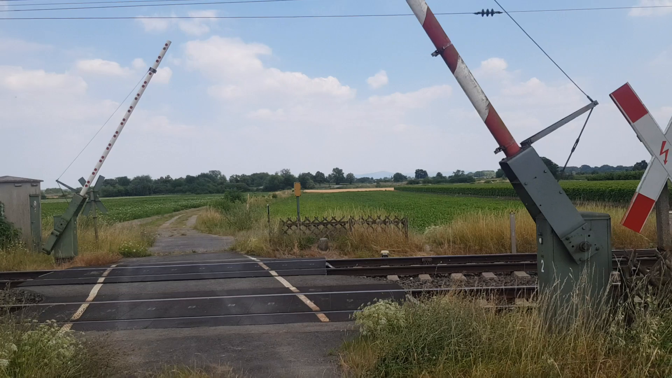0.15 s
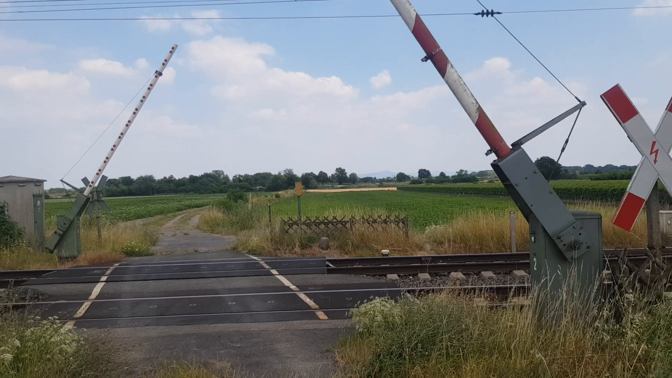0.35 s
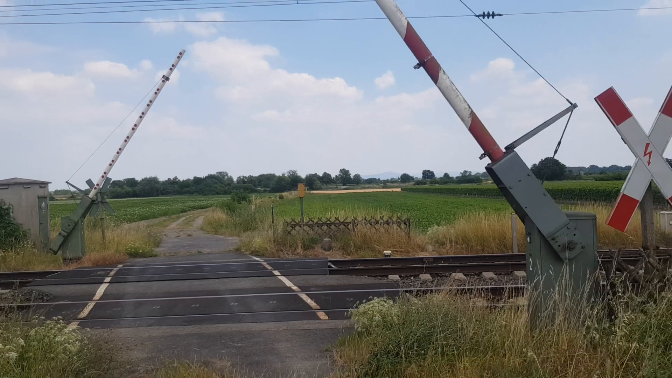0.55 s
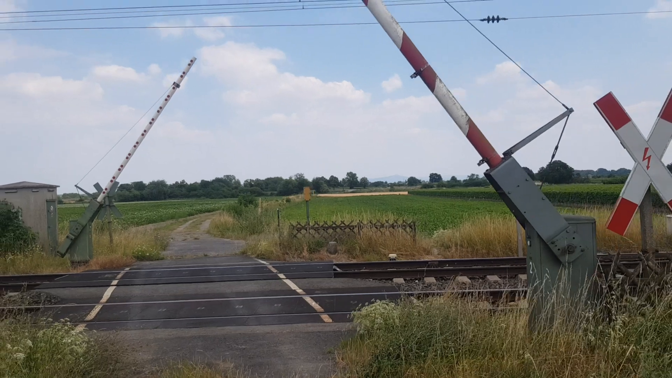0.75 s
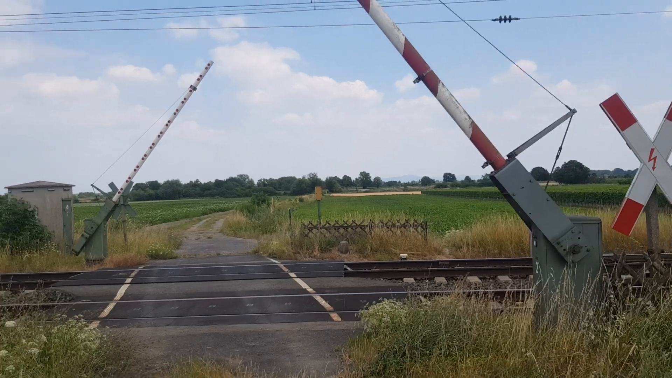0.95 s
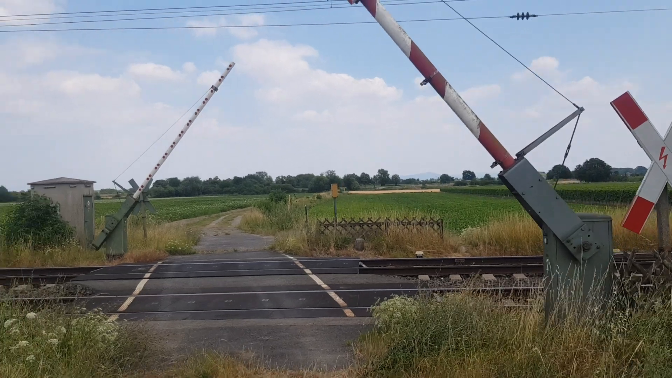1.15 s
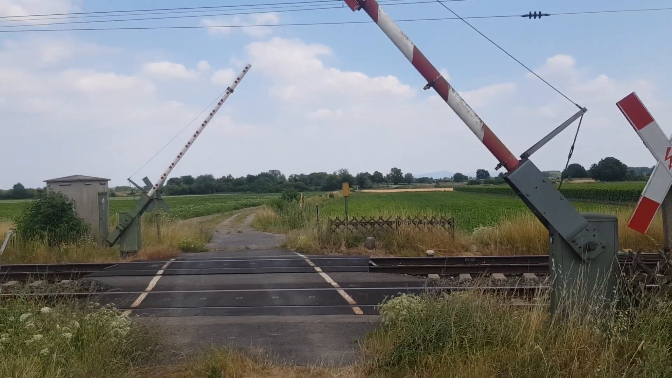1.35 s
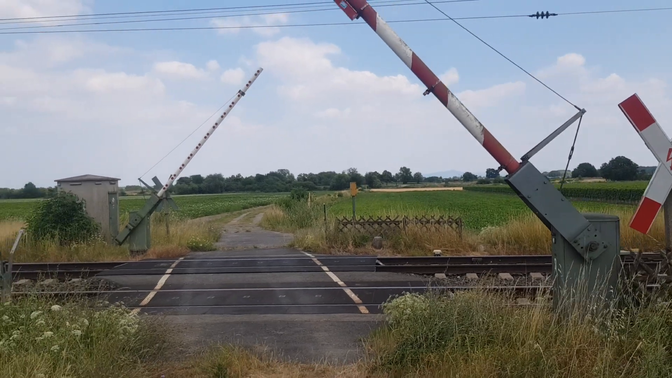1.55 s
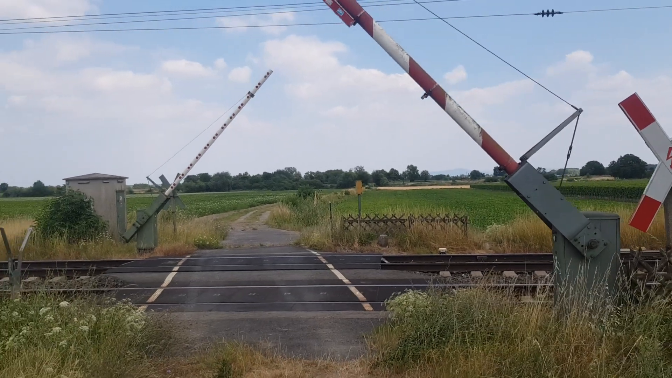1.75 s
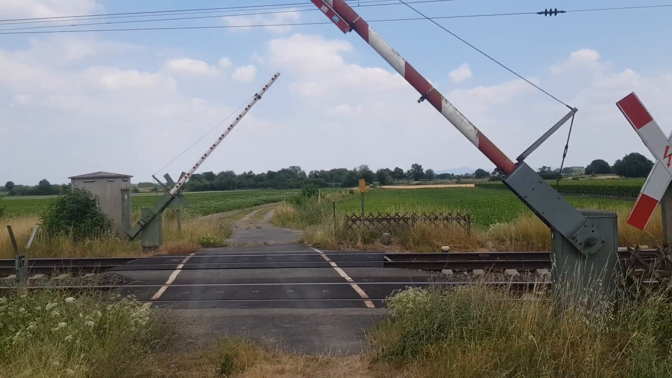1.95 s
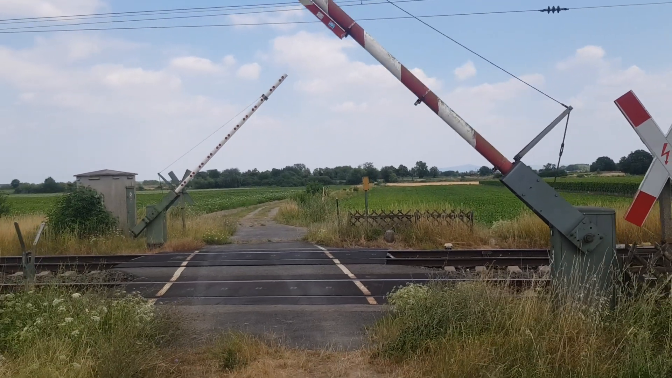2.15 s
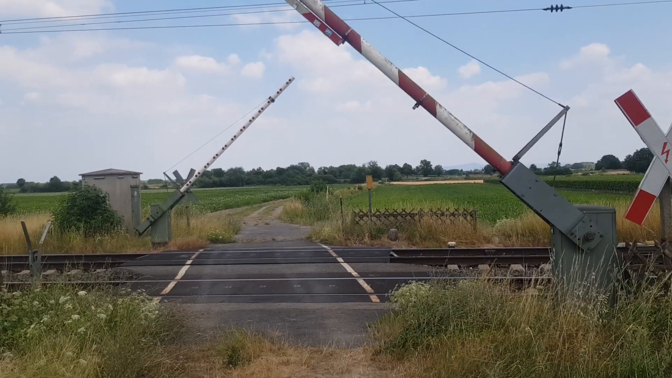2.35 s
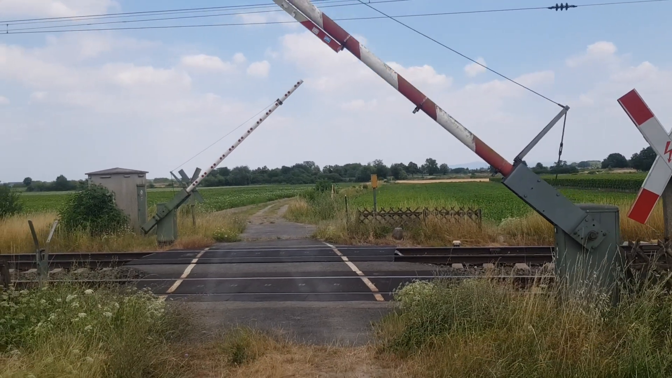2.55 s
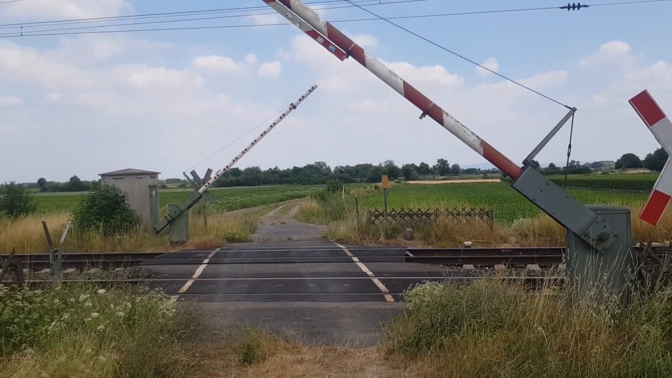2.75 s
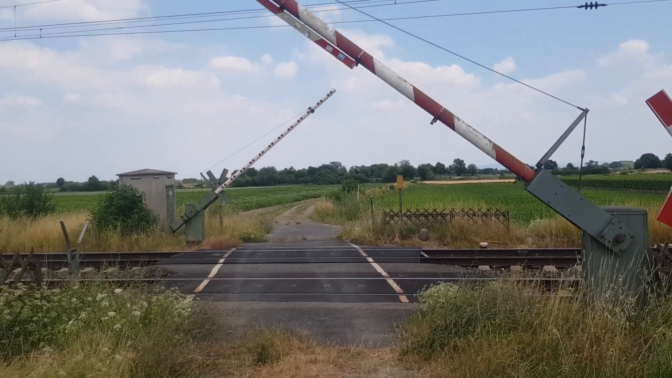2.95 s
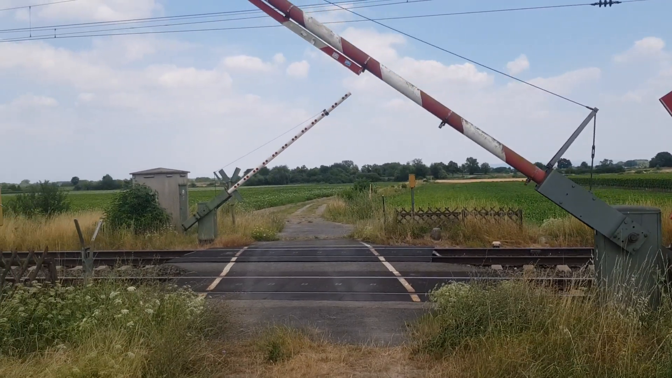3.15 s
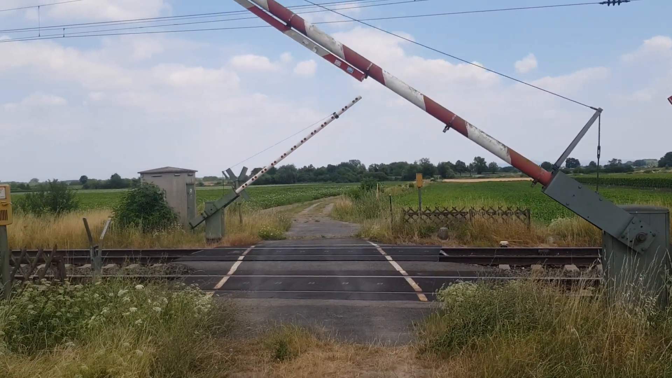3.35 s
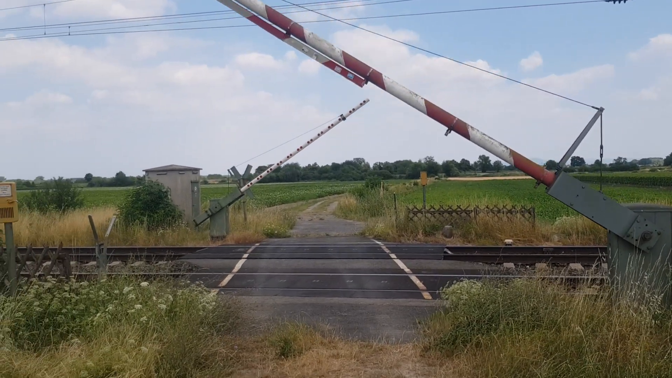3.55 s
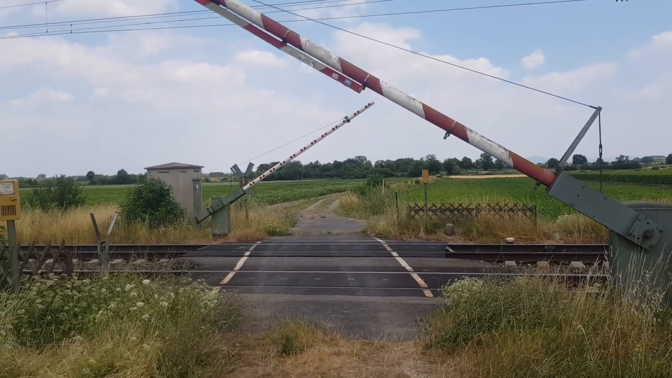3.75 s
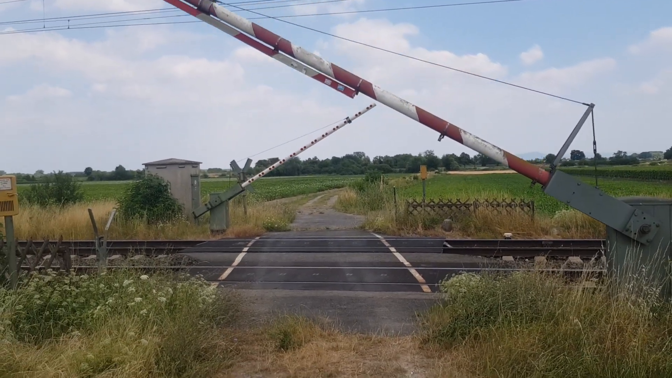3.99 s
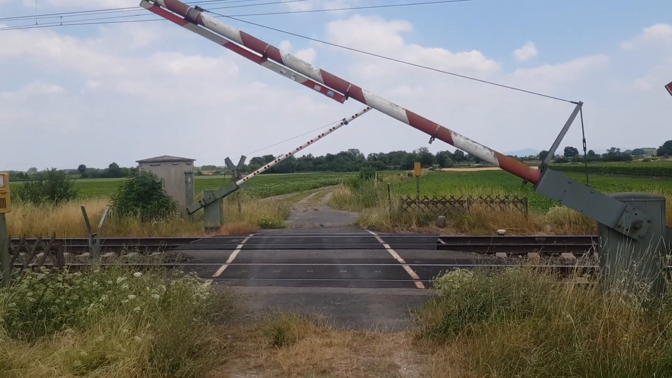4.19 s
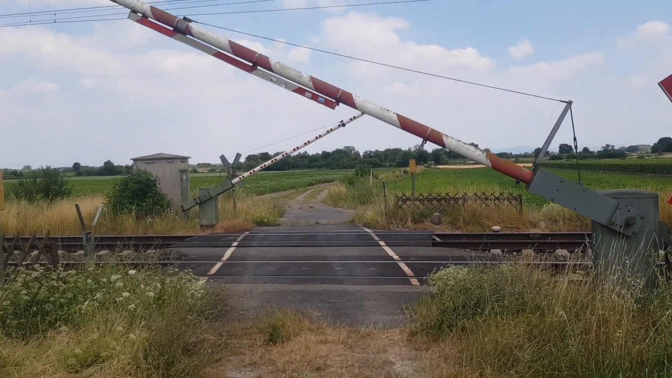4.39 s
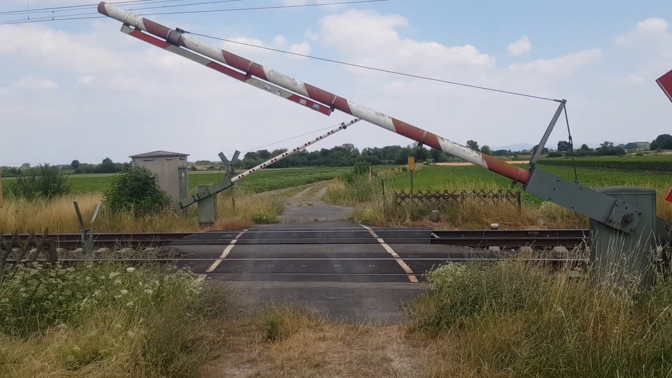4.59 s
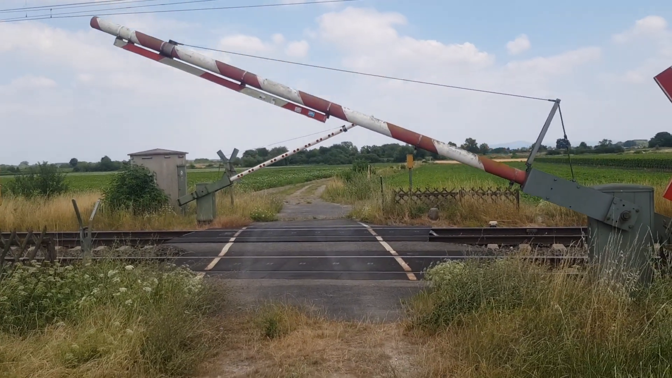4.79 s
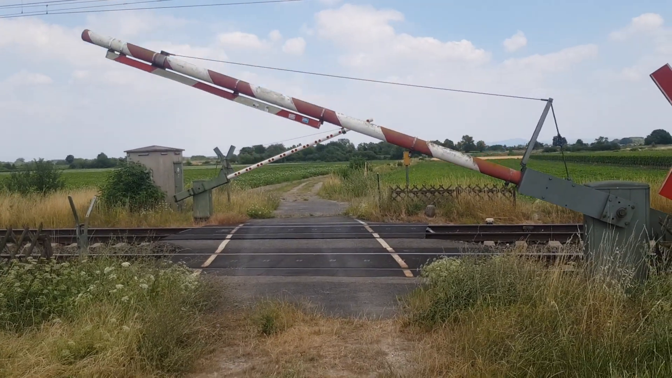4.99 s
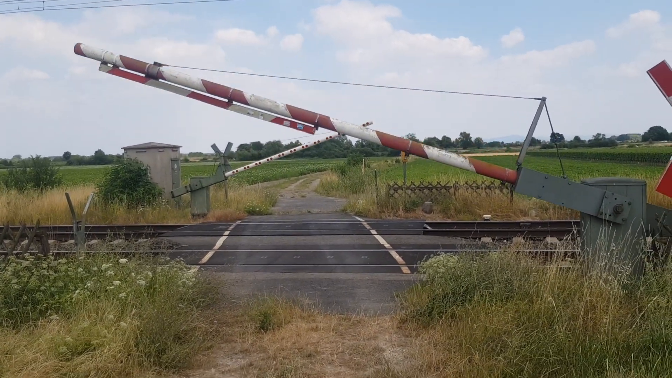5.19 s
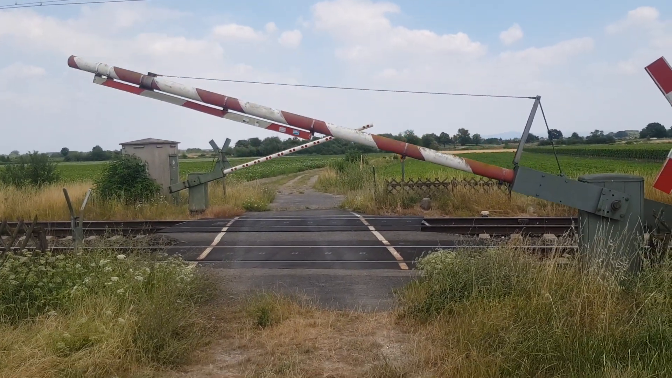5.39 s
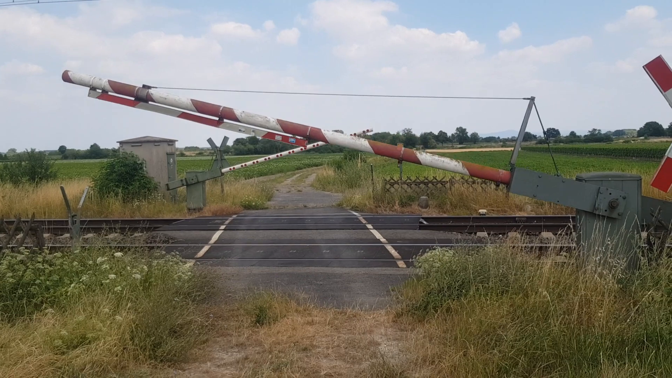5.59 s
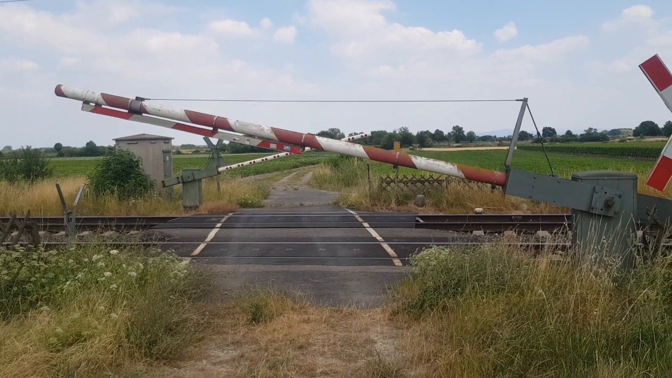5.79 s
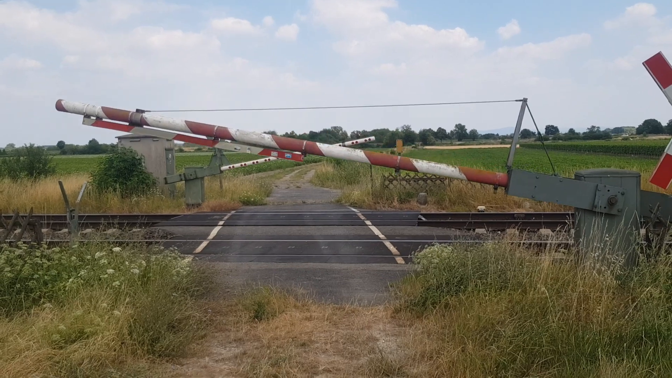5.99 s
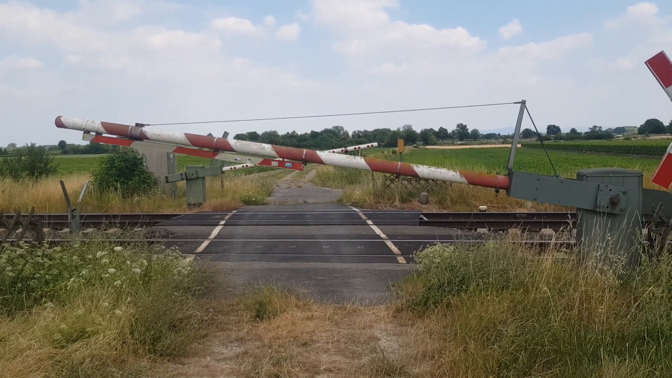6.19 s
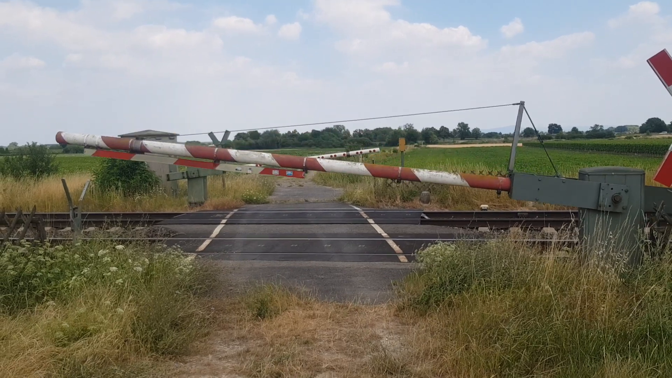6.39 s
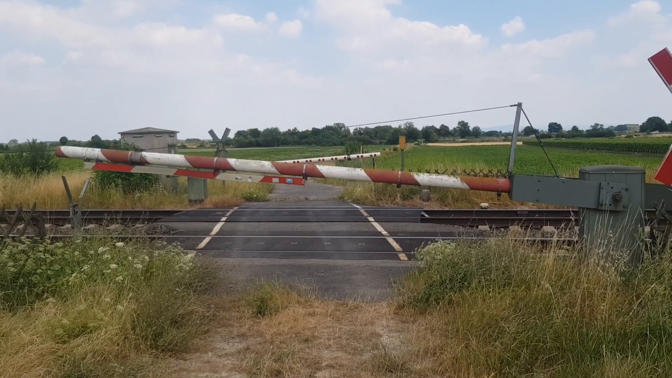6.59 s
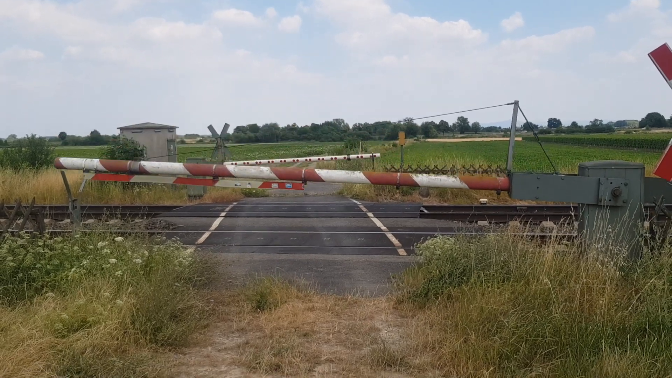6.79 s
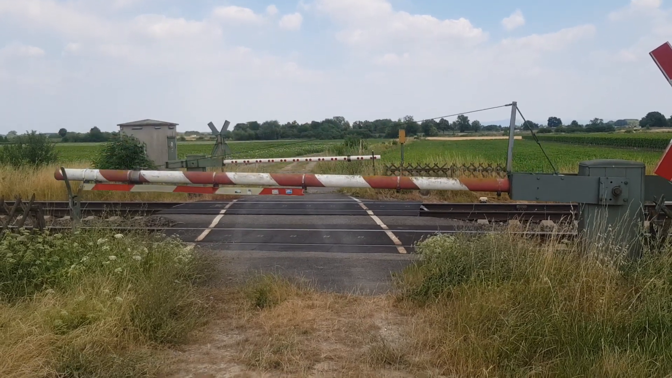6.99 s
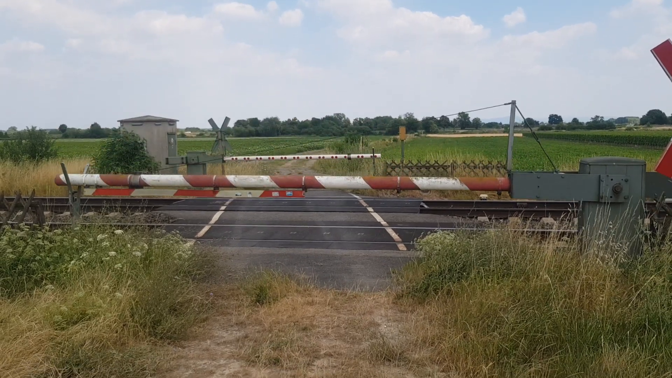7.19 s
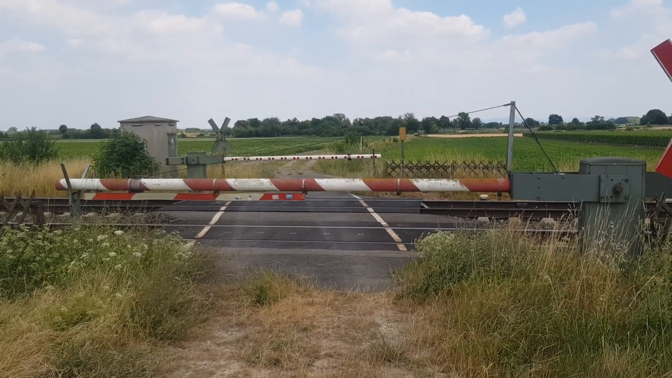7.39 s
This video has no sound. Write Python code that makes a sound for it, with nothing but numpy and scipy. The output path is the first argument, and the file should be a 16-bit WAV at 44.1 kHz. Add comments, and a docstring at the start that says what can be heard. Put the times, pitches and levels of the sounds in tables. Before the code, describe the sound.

From the start, the geared motor of a railway crossing barrier runs close by with a steady mid-pitched hum, higher whining tones that swell and fade, and a buzzing rattle from its steel case. A faint, high bearing squeal comes and goes on the right, while a thin hiss sits on the left. Small clicks occur at about 1.5 seconds. Light wind rumbles on the microphone, with a stronger puff around 4.2 seconds. At 5.5 seconds a dull knock sounds close on the left, followed by fainter ones around 6.4 as the hum and rattle grow slightly. The loudest knock comes at about 6.9 seconds as the boom lands. The motor runs free, slightly higher in pitch, then cuts off at 7.2 seconds and quickly spins down with a click. The setting is open fields with no echo.

```python
"""The geared motor of a level-crossing barrier hums and whines in its sheet-steel case as the boom comes down.
One shaft drives the gear tones, the rattle of the case and the squeal of a dry bearing.
The boom lands; the motor runs free for a moment, is switched off with a click and spins down.
A few dull knocks sound close by on the left, where there is also a thin high hiss.
Around it are open fields, and light wind brushes the microphone."""
import sys
import numpy as np
from scipy import signal
from scipy.fft import rfft, irfft, next_fast_len
from scipy.io import wavfile
from scipy.ndimage import map_coordinates

SR = 44100
rng = np.random.default_rng(int(sys.argv[2]) if len(sys.argv) > 2 else 0)


def materialize(psi):
    """Save the field psi as 16-bit PCM at rate SR to the path in sys.argv[1].

    A 1-D psi becomes a single channel; in a 2-D psi each row is a channel.
    """
    bounded = np.clip(np.atleast_2d(psi).T, -1, 1)
    quanta = np.round(bounded * 32767).astype(np.int16)
    wavfile.write(sys.argv[1], SR, quanta)


N = 328083
T = np.arange(N) / SR
SETTLE_S, LAND_S, OFF_S = 5.9, 6.87, 7.2  # boom settles, boom lands, current is cut
SETTLE_RISE_S, FREE_RISE_S, BRAKE_S = 0.29, 0.09, 0.34


def amp(db):
    """Decibels to gain."""
    return 10 ** (np.asarray(db) / 20)


def unit(x):
    """x scaled to rms 1."""
    return x / np.sqrt(np.mean(x ** 2) + 1e-20)


def along(points, hz, column=1):
    """One column of a frequency table, read on a log axis."""
    cols = np.transpose(points)
    return np.interp(np.log(hz + 1), np.log(cols[0] + 1), cols[column])


def curve(rows):
    """(seconds, value) rows interpolated to every sample."""
    return np.interp(T, *np.transpose(rows))


def ramp(start_s, length_s):
    """Rises from 0 to 1 and holds."""
    return np.clip((T - start_s) / length_s, 0, 1)


def swells(rows):
    """Summed bell curves in dB. Each row: centre in seconds, half-length in seconds, peak in dB."""
    return sum(db * np.exp(-((T - s) / half_s) ** 2) for s, half_s, db in rows)


def wobble(knots_per_s):
    """A smooth random curve."""
    coarse_s = T[::64]
    knots = rng.standard_normal(int(T[-1] * knots_per_s) + 4)
    return np.interp(T, coarse_s, map_coordinates(knots, [coarse_s * knots_per_s]))


def pan(db):
    """Constant-power stereo gains; db is left minus right."""
    pair = amp(np.array([[.5], [-.5]]) * db)
    return pair / np.sqrt(np.mean(pair ** 2, axis=0))


def filtered(x, response):
    """x shaped by a frequency response."""
    size = next_fast_len(N + 8192)
    return irfft(rfft(x, size) * response(np.fft.rfftfreq(size, 1 / SR)), size)[..., :N]


def noise(spectrum):
    """Coloured stereo noise, rms 1."""
    return unit(filtered(rng.standard_normal((2, N)), lambda hz: amp(along(spectrum, hz))))


def alike(pair, correlation):
    """Mixes two unrelated signals into correlated channels."""
    angle = np.arccos(np.clip(correlation, -1, 1)) / 2
    return np.cos(angle) * pair[0] + np.array([[1], [-1]]) * np.sin(angle) * pair[1]


def pace():
    """Shaft speed over loaded speed: up as the boom lands, then braked ever harder after the cut."""
    braking = np.maximum(1 - ramp(OFF_S, BRAKE_S) ** 1.3, .05)
    return (1 + .035 * ramp(LAND_S, FREE_RISE_S)) * braking


# Wind on the microphone. Each row: frequency in Hz, relative density in dB.
WIND_SPECTRUM = [(20, -18), (35, -2.5), (55, 4), (90, 2.5), (130, -7.5), (190, -16), (300, -35), (600, -62)]
# Puffs and lulls. Each row: centre in seconds, half-length in seconds, gain in dB.
WIND_PUFFS = [(.1, 0.16, 3), (.44, 0.032, 9), (.88, .06, 3.5), (1.55, .45, -3.5), (2.48, .035, 11),
              (3.36, 0.045, 5), (4.23, 0.073, 15), (4.34, 0.037, 11), (5.95, 0.022, 11), (6.6, 0.42, 4),
              (7.42, 0.2, 11)]


def wind(breeze_db=-56):
    """A low rumble; stronger puffs buffet each side of the microphone separately, mainly the left."""
    puff_db = swells(WIND_PUFFS)
    correlation = np.clip(.6 - .05 * puff_db, .1, .75)
    level_db = breeze_db + puff_db + 1.8 * wobble(14)
    return amp(level_db) * alike(noise(WIND_SPECTRUM), correlation) * pan(0.69 + 0.95 * puff_db)


# Hiss and sizzle colours. Each row: frequency in Hz, relative density in dB.
HISS_SPECTRUM = [(5000, -42), (7800, -14.5), (9000, -2.5), (9750, 2.5), (10300, -1.5), (11500, -2.5),
                 (13200, -10), (16000, -15)]
SIZZLE_SPECTRUM = [(12000, -40), (13400, -12), (14400, 2), (15600, 0)]
# Hiss before braking. Each row: time in seconds, level in dB.
HISS_ENVELOPE = [(0, -61.5), (.9, -62), (1.7, -64.2), (3.7, -63.9), (5.2, -66), (6.6, -64), (7.1, -66)]
# Sizzle swells and dips. Each row: centre in seconds, half-length in seconds, gain in dB.
SIZZLE_BUMPS = [(2.7, .35, -4), (3.27, .18, 6), (6.35, .08, 4), (7.27, .16, 5.5)]


def hiss(sizzle_base_db=-62.5, flutter_hz=88.7):
    """A thin hiss that dies with the motor and a higher, fluttering sizzle, both mostly on the left."""
    hiss_db = curve(HISS_ENVELOPE) + 0.51 * wobble(7)
    sizzle_db = sizzle_base_db + swells(SIZZLE_BUMPS) + 1.3 * wobble(7)
    phase = 2 * np.pi * np.cumsum(flutter_hz + 1.5 * wobble(4)) / SR
    flutter = unit(1 + 0.65 * np.cos(phase) + 0.48 * np.cos(2 * phase))
    thin_hiss = amp(hiss_db) * np.minimum(pace(), 1) ** 4 * noise(HISS_SPECTRUM)
    sizzle = amp(sizzle_db) * flutter * noise(SIZZLE_SPECTRUM)
    return thin_hiss * pan(13) + sizzle * pan(14)


# Click colour. Each row: frequency in Hz, relative density in dB.
CLICK_SPECTRUM = [(300, -9), (1000, -4), (1750, 2), (3000, -6), (4000, 0), (5000, -7), (6300, -4),
                  (8000, -14), (15000, -24)]
# Contacts. Each row: start in seconds, level in dB, t60 in seconds, low-pass corner in Hz, pan in dB.
CLICK_HITS = [(1.5003, -37.5, .009, 6000, 0), (1.565, -39, .028, 4500, 2), (1.574, -43, .04, 2200, 2),
              (7.02, -43.5, .35, 2200, 3), (7.3005, -34.5, .022, 7000, 2), (7.303, -41, .13, 1200, 4)]


def clicks():
    """Noise bursts from the linkage and end switch; harder contacts are brighter."""
    burst = noise(CLICK_SPECTRUM)
    out = np.zeros((2, N))
    for start_s, db, t60_s, corner_hz, pan_db in CLICK_HITS:
        envelope = amp(db - 60 * abs(T - start_s) / t60_s) * (T >= start_s)
        lowpass = signal.butter(2, corner_hz, fs=SR, output="sos")
        out += envelope * pan(pan_db) * unit(signal.sosfilt(lowpass, burst))
    return out


# Knocks. Each row: start in seconds, relative level in dB, ring in Hz, t60 in seconds, pan in dB.
KNOCK_HITS = [(5.5386, -23, 342, 0.051, 22), (5.551, -28, 126, 0.076, 14), (6.242, -42, 420, .05, 10),
              (6.428, -38, 235, 0.058, 13), (6.4615, -31, 430, 0.029, 18), (6.863, -13, 399, 0.041, 21),
              (6.872, -28, 425, 0.053, 10), (7.138, -36.5, 106, 0.048, 12)]
# Modes of a knock. Each row: multiple of the ring frequency, gain in dB, multiple of the t60.
DAMPED_MODES = [(.42, -15.5, 1.9), (1, 1, 0.85), (1.25, -6, 0.57), (1.9, -9.5, 0.54), (2.85, -13, .3),
                (5.1, -15.5, 0.19)]


def knocks(gain_db=6, attack_s=0.0012):
    """Soft contacts ring a few heavily damped modes."""
    out = np.zeros((2, N + SR))
    t = np.arange(SR // 4) / SR
    attack = 1 - np.exp(-t / attack_s)
    for start_s, db, ring_hz, t60_s, pan_db in KNOCK_HITS:
        ring = sum(amp(mode_db - 60 * t / (t60_s * t60_ratio)) * np.sin(2 * np.pi * ring_hz * ratio * t)
                   for ratio, mode_db, t60_ratio in DAMPED_MODES)
        start = round(start_s * SR)
        out[:, start:start + len(t)] += amp(db + gain_db) * pan(pan_db) * ring * attack
    return out[:, :N]


# Frame rumble. Each row: frequency in Hz, relative density in dB.
FRAME_SPECTRUM = [(90, -32), (170, 0), (250, 1), (320, 1), (400, -5.5), (700, -41.5)]


def shudder(base_db=-75):
    """The frame rumbles unevenly, more as the boom settles, as it lands and as the motor brakes."""
    rise_db = 13 * ramp(SETTLE_S, SETTLE_RISE_S) + 5 * ramp(LAND_S, FREE_RISE_S) + 6 * ramp(OFF_S, .1)
    return amp(base_db + rise_db + 2.2 * wobble(14)) * alike(noise(FRAME_SPECTRUM), 0.96) * pan(4)


def shaking(turns, repeat_db, pulse_depth):
    """Force of teeth and bearings: part repeats every turn, the rest is rubbing pulsed by the shaft."""
    one_turn = signal.resample(rng.standard_normal((2, 512)), 4096, axis=1)
    position = (turns % 1 * one_turn.shape[1]).astype(int)
    repeating = unit(one_turn[:, position])
    pulsing = 1 + pulse_depth * sum(np.cos(2 * np.pi * (k * turns + rng.random())) for k in range(1, 6))
    return amp(repeat_db) * repeating + pulsing * rng.standard_normal((2, N))


# Spells of squeal. Each row: centre in seconds, half-length in seconds, gain in dB.
SQUEAL_SPELLS = [(.24, 0.25, 13), (2.4, 1.8, 6.5), (3.96, .08, 8), (5.82, 0.075, 6), (7, 0.14, 6)]


def squeal(turns, base_db=-69, centre_hz=4525, width_hz=170):
    """Rubbing in a dry bearing feeds one high resonance, pulsing once a turn."""
    rubbing = shaking(turns, repeat_db=-7, pulse_depth=.08)
    ring = filtered(rubbing, lambda hz: 1 / (1 + (2 * (hz - centre_hz) / width_hz) ** 2))
    pulsing = 1 + 0.33 * np.sin(2 * np.pi * turns)
    level_db = base_db + swells(SQUEAL_SPELLS) + 1.5 * wobble(16)
    return amp(level_db) * unit(pulsing * ring) * pan(-8.5)


# Radiation of the case. Each row: frequency in Hz, relative gain in dB, pan in dB.
CASE_RESPONSE = [(233, -16.5, -6), (316, -8.5, 0), (412, -1.5, 2.5), (670, -1.5, 1.5), (975, -8.5, 4),
                 (1600, -7.5, -1.5), (1860, -10.5, 6), (2250, -9, 3.5), (2330, -11.5, 10), (2920, -11, 11),
                 (3670, -15.5, 3), (4360, -14.5, -8), (6070, -20.5, 6.5), (7240, -32, 9)]


def steel_case(hz):
    """Stereo response of the sheet-steel case, rolled off at both ends."""
    lowpass = 1 / np.sqrt(1 + (hz / 7600) ** 16)
    highpass = hz / np.hypot(hz, 120)
    return amp(along(CASE_RESPONSE, hz)) * pan(along(CASE_RESPONSE, hz, column=2)) * lowpass * highpass


def rattle(turns, churn_base_db=-55.5, buzz_base_db=-52.5, crossover_hz=1250, left_lead_s=0.00013):
    """The shaken case radiates a low churn and a bright, more regular buzz."""
    low_share = lambda hz: 1 / (1 + (hz / crossover_hz) ** 6)
    lead = lambda hz: np.exp(2j * np.pi * hz * left_lead_s * np.array([[.5], [-.5]]))
    rubbing = alike(shaking(turns, repeat_db=-10.5, pulse_depth=0.094), 0.5)
    buzzing = shaking(turns, repeat_db=-7, pulse_depth=.12)
    churn = unit(filtered(rubbing, lambda hz: steel_case(hz) * lead(hz) * np.sqrt(low_share(hz))))
    buzz = unit(filtered(buzzing, lambda hz: steel_case(hz) * np.sqrt(1 - low_share(hz))))
    settled, freed = ramp(SETTLE_S, SETTLE_RISE_S), ramp(LAND_S, FREE_RISE_S)
    churn_db = churn_base_db + 3.5 * settled + swells([(7.31, 0.04, 4.7)]) + 1.26 * wobble(12)
    buzz_db = buzz_base_db + settled + 0.7 * freed + swells([(.1, .5, 2)]) + 0.84 * wobble(9)
    return amp(churn_db) * churn + amp(buzz_db) * np.sqrt(np.minimum(pace(), 1)) * buzz


def tone(turns, order, waver_db, lag_rad_per_order=.03):
    """One wavering shaft order; the drive stands to the right, so the left channel lags."""
    lag_rad = min(order * lag_rad_per_order, np.pi / 2)
    phase = rng.uniform(0, 2 * np.pi) + np.array([[-.5], [.5]]) * lag_rad
    angle = 2 * np.pi * (order * turns % 1) + phase
    return np.sqrt(2) * np.sin(angle) * amp(waver_db * wobble(5))


# Tones that swell once, each at its own boom angle. Each row, keyed by shaft order: base level in dB,
# pan in dB, swell centre in seconds, half-length in seconds, swell in dB.
SWELLING_ORDERS = {21: (-75, -2, 6, 1, 12.5), 35: (-79.5, 5, 0.3, 2.3, 17.5), 40: (-70, -1, .7, 1.5, 15),
                   45: (-61.5, 1, 6.5, 1.1, 9.8), 52: (-69.5, 5, 6, 0.5, 10.5), 64: (-64, 6, 2, 0.8, 6.5),
                   83: (-61, 12, 1.6, 1.25, 6), 88: (-68.5, 9, 5, 0.3, 6), 100: (-64.5, 2, .2, .28, 7),
                   117: (-79, -6, 5.8, 3.5, 12.5)}
# Steady gear and slot tones. Each row: shaft order, level in dB, pan in dB.
STEADY_ORDERS = [(13, -76, 2), (18, -66, 2), (24, -68.5, 5), (33, -76, 2), (44, -73, -1), (54, -73, 8),
                 (58, -74, 3), (61, -70, 0), (62, -74, 2), (63, -75, 5), (69, -70, 17), (76, -71, 14),
                 (78, -70, 13), (79, -69, 10), (81, -71, 9), (82, -69, 15), (85, -71, 12), (86, -68, 11),
                 (90, -71, 7), (91, -69, 7), (102, -76, 0), (124, -71, -6), (126, -71, -7), (127, -70, -6),
                 (128, -67, -9)]


def whine(turns, unloaded_db=-4.5):
    """Higher gear and slot orders; the swelling ones chatter, flutter once a turn and drop off load."""
    swelling = np.zeros((2, N))
    for order, (db, pan_db, *swell) in SWELLING_ORDERS.items():
        chatter = unit(1 + .22 * wobble(60))
        swelling += amp(db + swells([swell])) * pan(pan_db) * chatter * tone(turns, order, waver_db=1.1)
    steady = sum(amp(db) * pan(pan_db) * tone(turns, order, waver_db=2.8)
                 for order, db, pan_db in STEADY_ORDERS)
    flutter = 1 + .18 * np.sin(2 * np.pi * turns)
    load = amp(unloaded_db * ramp(LAND_S, FREE_RISE_S))
    return load * flutter * swelling + steady


# Main gear hum. Each row: time in seconds, base level in dB.
MESH_ENVELOPE = [(0, -54.5), (1.05, -51.2), (2.4, -49), (4.1, -50), (5.05, -52.5), (6.2, -47.5),
                 (6.8, -49.5)]
# Teeth go slack after landing, then bite. Each row: centre in seconds, half-length in seconds, gain in dB.
MESH_BACKLASH = [(6.97, 0.064, -8), (7.16, 0.025, 3.5)]


def mesh(turns, teeth=12, release_db_per_s=210):
    """The main gear hums; uneven teeth throb once a turn and a slightly faster mesh beats against it."""
    release_db = release_db_per_s * np.maximum(T - OFF_S, 0)
    level_db = curve(MESH_ENVELOPE) + swells(MESH_BACKLASH) - release_db
    throb = 1 + 0.11 * np.sin(2 * np.pi * turns) + 0.051 * wobble(45)
    hum = throb * tone(turns, teeth, waver_db=0.82, lag_rad_per_order=0.031)
    beat = amp(-14) * tone(1.039 * turns, teeth, waver_db=3.5, lag_rad_per_order=0.018)
    return amp(level_db) * (hum + beat) * pan(1.2)


# Motor shaft. Each row: time in seconds, speed under load in turns per second.
LOADED_SPEED = [(0.0, 35.4), (0.4, 35.3), (0.63, 35.5), (0.97, 35.3), (1.09, 35.4), (1.85, 35.3),
                (2.8, 35.4), (4.58, 35.4), (5.65, 35.5), (5.78, 35.4), (6.35, 35.6), (6.85, 35.4)]


def motor():
    """One slightly unsteady shaft drives tones and rattle; whine and squeal die quickly as it slows."""
    shaft_hz = curve(LOADED_SPEED) * pace() + .03 * wobble(14)
    turns = np.cumsum(shaft_hz) / SR
    drive = np.minimum(pace(), 1) ** 8
    return mesh(turns) + drive * whine(turns) + pace() * rattle(turns) + drive * squeal(turns)


def scene():
    """Open air, no echo."""
    return motor() + shudder() + knocks() + clicks() + wind() + hiss()


def record(dry, band_limit_hz=15830):
    """Brick-wall low-pass."""
    return filtered(dry, lambda hz: hz < band_limit_hz)


dry = scene()
out = record(dry)
materialize(out)
```